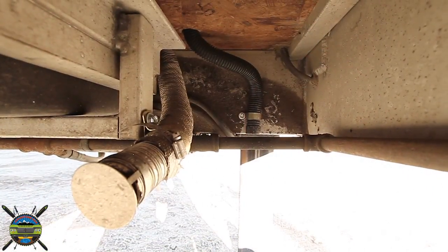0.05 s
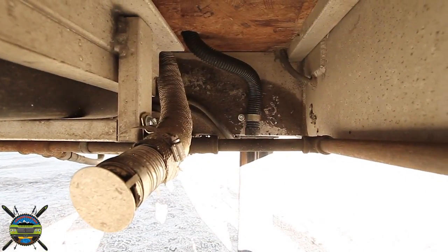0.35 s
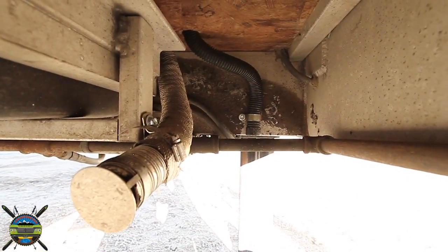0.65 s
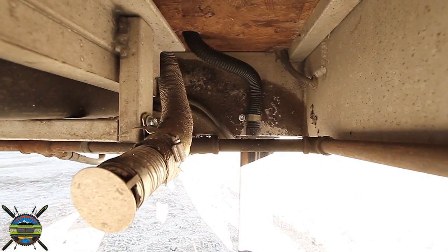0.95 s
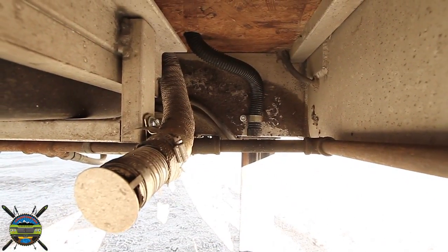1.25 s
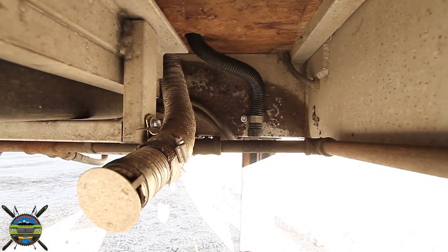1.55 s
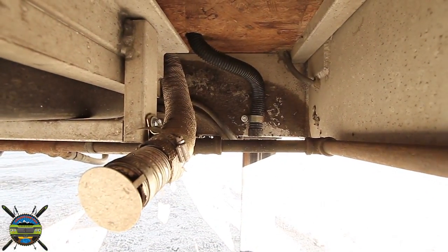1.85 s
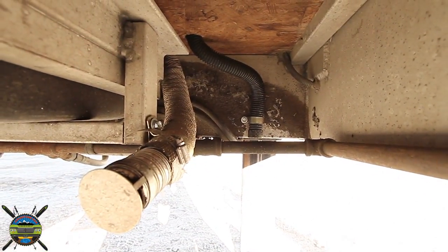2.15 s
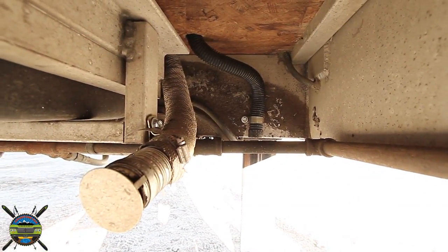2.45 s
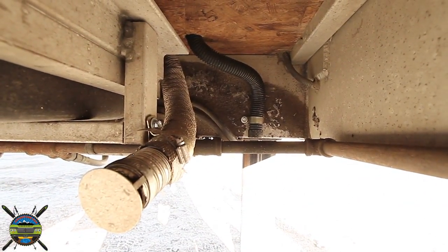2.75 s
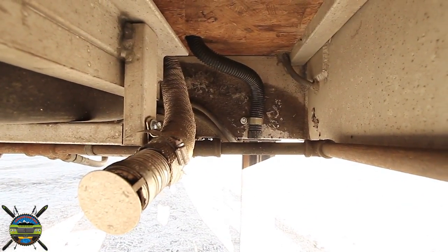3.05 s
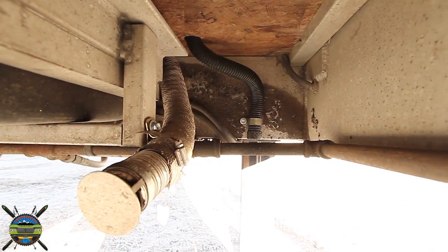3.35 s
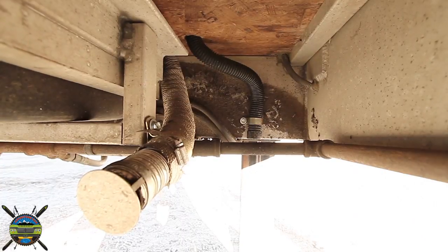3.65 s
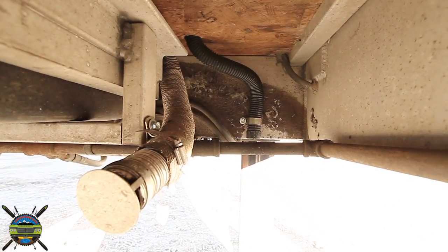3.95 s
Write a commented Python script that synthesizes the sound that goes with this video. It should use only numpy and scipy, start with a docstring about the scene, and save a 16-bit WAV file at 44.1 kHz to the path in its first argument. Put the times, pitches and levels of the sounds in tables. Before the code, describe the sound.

Low, unevenly puffing drone of a running air heater's exhaust, with a faint high motor whine.

```python
"""Outdoors, one microphone close to the exhaust pipe of a fuel-burning air heater under a parked vehicle.
The heater is running from the start: the flame's turbulence drones in the resonances of burner and pipe,
gas hisses out of the end cap, and the blower motor holds a thin whine. Every 0.83 s a dose of fuel
swells the sound and lifts the upper resonances. The flame puffs unevenly to the end,
with a few faint ticks and rustles on top."""
import sys
import numpy as np
from scipy import signal
from scipy.fft import rfft, irfft
from scipy.io import wavfile

SR = 44100
rng = np.random.default_rng(int(sys.argv[2]) if len(sys.argv) > 2 else 0)


def to_wav(s):
    """Save 16-bit WAV."""
    ch = np.atleast_2d(s).T  # columns
    pcm = np.round(np.clip(ch, -1, 1) * 32767)  # PCM
    wavfile.write(sys.argv[1], SR, pcm.astype(np.int16))


N = 176400
TIME = np.arange(N) / SR


def from_db(db):
    """Decibels to gain."""
    return 10 ** (np.asarray(db) / 20)


def rms_one(x):
    """Scale to unit rms."""
    return x / np.sqrt(np.mean(np.abs(x) ** 2) + 1e-20)


def drift(per_s):
    """Smooth random wander of spread 1, changing about `per_s` times a second."""
    step, run_in = 40, 2000   # samples per step; steps left to settle
    pole = np.exp(-2 * np.pi * per_s * step / SR)
    white = rng.standard_normal(N // step + run_in + 2)
    slow = signal.lfilter([1], [1, -2 * pole, pole * pole], white)[run_in:]
    return np.interp(np.arange(N) / step, np.arange(len(slow)), rms_one(slow))


def bump(middle_s, half_width_s):
    """A smooth rise and fall around one moment."""
    return np.exp(-((TIME - middle_s) / half_width_s) ** 2)


def coloured(x, spectrum):
    """Filter by a table of frequency_hz, gain_db."""
    hz, db = np.transpose(spectrum)
    bins_hz = np.maximum(np.arange(N // 2 + 1) * SR / N, 1)
    gain_db = np.interp(np.log(bins_hz), np.log(hz), db)
    return irfft(rfft(x) * from_db(gain_db), N)


def noise(spectrum):
    """Noise shaped by a table of frequency_hz, density_db (power in a 1 Hz band)."""
    return coloured(rng.standard_normal(N) * np.sqrt(SR / 2), spectrum)


def resonance(centre_hz, width_hz):
    """Turbulence ringing in one resonance whose centre may move; rms 1."""
    turbulence = rng.standard_normal((2, N + SR // 2))
    lowpass = signal.butter(2, width_hz / 2, fs=SR, output="sos")
    in_phase, quadrature = signal.sosfilt(lowpass, turbulence)[:, -N:]
    phase = 2 * np.pi * np.cumsum(centre_hz) / SR
    return rms_one(in_phase * np.cos(phase) + quadrature * np.sin(phase))


def driven(modes, dose):
    """Resonances whose level and pitch each follow the fuel dose (-1 to 1) by their own amount."""
    return sum(from_db(db + swell_db * dose) * resonance(hz + rise_hz * dose, width_hz)
               for hz, width_hz, db, swell_db, rise_hz in modes)


def flame(dose):
    """The burner's drone over an uneven rumble; both jump with each puff."""
    # low rumble of the flame: frequency_hz, density_db
    rumble_spectrum = [(15, -82), (28, -78.5), (50, -63), (75, -56.5), (105, -55), (155, -55.5),
                       (220, -67.5), (500, -99), (2000, -140)]
    # rise and fall of the rumble: time_s, gain_db
    rumble_curve = [(0, -4.5), (.35, -5), (.55, -0.5), (.85, 3), (1.3, 0), (1.5, 0.5), (2.12, 3),
                    (2.35, -5.5), (2.7, 2.5), (3.05, -4.5), (3.45, 2), (3.8, -8), (4, -3.5)]
    # lowest resonances of the burner: pitch_hz, width_hz, level_db, swell_db, rise_hz
    burner_modes = [(190.1, 28, -32, 2.5, 0), (243.2, 45.6, -25.5, 0.7, 0.0016),
                    (275.1, 32.6, -26.5, -0.5, 0.0033)]
    # puffs of the flame: middle_s, boost_db
    puffs = [(0.079, 8), (.16, 6), (.317, 2.5), (.54, 3.5), (.762, 5.5), (.835, 8), (0.979, 6), (1.06, 5),
             (1.15, 7), (1.342, 4), (1.42, 7.5), (1.74, 6.5), (2.125, 4), (2.715, 5), (2.82, 5.5),
             (2.967, 4), (3.15, 6), (3.415, 5.5), (3.47, 5), (3.649, 6.5)]
    steadiness, settle_s = .89, .059   # share of its chance swings that the flame evens out, and how fast
    between_puffs_db = -1.67
    rumble_db = np.interp(TIME, *np.transpose(rumble_curve)) + 2 * drift(per_s=12)
    rumble = noise(rumble_spectrum) * from_db(rumble_db)
    drone = driven(burner_modes, dose) * from_db(2.5 * drift(per_s=16))
    roar = drone + rumble
    window = signal.windows.hann(int(2 * settle_s * SR))
    power = signal.fftconvolve(rms_one(roar) ** 2, window / window.sum(), "same")
    steady_roar = roar / np.maximum(power, 1e-3) ** (steadiness / 2)
    puffs_db = sum(db * bump(middle_s, half_width_s=.019) for middle_s, db in puffs)
    return steady_roar * from_db(between_puffs_db + puffs_db)


def exhaust(dose):
    """Gas rings the pipe, rushes out and hisses at the end cap, fluttering with the flame's turbulence."""
    # resonances of the exhaust pipe: pitch_hz, width_hz, level_db, swell_db, rise_hz
    pipe_modes = [ (377.9, 60, -34.5, 1.1, 0), (556.7, 42, -40, 0, -5.5), (662.5, 42, -34, -0.5, 0),
                  (732.3, 36, -31, 0.5, -0.5), (835, 136, -33.5, 1.2, 0), (974, 87, -33, 1.1, -0.5),
                  (1331, 57, -32.5, 0, 3), (1420.5, 59, -34.5, -0.5, 3), (1523, 74, -37, 1.8, 11.5),
                  (1751, 34, -46, 0, -0.5), (1853, 24, -46, 0, -0.5), (1906, 36, -45, -1.5, 3.5),
                  (2052, 49, -44, 0.51, 2)]
    # hollow hiss at the end cap: pitch_hz, width_hz, level_db, swell_db, rise_hz
    outlet_modes = [ (2205, 110, -52.5, 3, 10), (2676, 120, -48.5, -1.5, 1), (2862, 157, -43, 0.3, 85),
                    (3416, 150, -50.5, 1.5, 25), (4750, 130, -66.5, 1, -1.5), (5050, 90, -71, 4, 6.5),
                    (5430, 110, -71, -2, 8), (5780, 115, -69, 5, 15), (7420, 290, -73.5, -2.5, -2.5),
                    (8040, 140, -78.5, -0.5, -2), (8620, 310, -76.5, 1.5, -2), (9400, 400, -83.5, 0, -0.5)]
    # broad rush of the exhaust: frequency_hz, density_db
    rush_spectrum = [(100, -76.5), (200, -52.5), (320, -61.5), (450, -63.5), (520, -61), (605, -61.5),
                     (770, -56.5), (990, -56), (1080, -76.5), (1230, -61.5), (1680, -71.5), (2000, -73.5),
                     (2400, -82), (3100, -77.5), (3270, -75), (3680, -83), (4000, -87), (4500, -87.5),
                     (5000, -99.5), (5600, -101), (6400, -107), (7200, -104), (9400, -110), (10500, -115),
                     (15500, -116.5)]
    rush = from_db(.3 * dose) * noise(rush_spectrum)
    # each outlet resonance also flickers by itself
    hiss = sum(from_db(1.2 * drift(per_s=6.5)) * driven([mode], dose) for mode in outlet_modes)
    flutter = from_db(.73 * drift(per_s=17))
    return flutter * (driven(pipe_modes, dose) + hiss + rush)


def blower_whine():
    """The blower motor's thin steady tones, wavering very slightly in pitch and level."""
    # tones of the motor: pitch_hz, relative_level_db
    tones = [(3790, -47), (3881, -70.5), (3919, -65.5), (4048, -56.5), (4404, -65), (4436, -67),
             (4565, -76.5), (4823, -72), (11881, -90)]
    gain_db, waver_db, wander_hz = 3, .56, .8
    offset_hz = wander_hz * drift(per_s=2)
    whine = np.zeros(N)
    for hz, db in tones:
        gain = from_db(db + gain_db + waver_db * drift(per_s=11))
        cycles = np.cumsum(hz + offset_hz) / SR + rng.random()
        whine += gain * np.sin(2 * np.pi * cycles)
    return whine


def ticks_and_rustles():
    """Short bright ticks, grainy rustles and tiny random crackles, all with the same tone colour."""
    # faint ticks: start_s, relative_level_db
    ticks = [(0.2239, -43), (0.7043, -60), (1.9979, -49), (2.6145, -48), (2.6329, -49), (2.8185, -56),
             (2.9677, -51.5), (3.2331, -56), (3.6344, -56), (3.906, -57)]
    # scratchy rustles: middle_s, half_width_s, relative_level_db
    rustles = [(.235, .017, -60), (.33, .05, -73), (.42, .03, -67), (0.683, .04, -72), (.8, .04, -73),
               (1.4, .04, -75), (1.64, .025, -74), (2.01, .04, -75), (2.53, .015, -72), (2.645, .04, -67),
               (2.99, .02, -71), (3.075, .038, -59)]
    # their bright colour: frequency_hz, gain_db
    colour = [(2000, -12.5), (5200, 2.5), (8000, -1), (12000, -3), (15500, -5.5)]
    tick_gain_db, decay_s = -.5, .0042
    crackles_per_s, crackle_gain_db = 23, -71.5
    tick_envelope = np.zeros(N)
    for start_s, db in ticks:
        decay = np.exp(-np.maximum(TIME - start_s, 0) / decay_s)
        tick_envelope += (TIME > start_s) * from_db(db + tick_gain_db) * decay
    rustle_envelope = sum(from_db(db) * bump(middle_s, half_s) for middle_s, half_s, db in rustles)
    grains = rms_one(rng.standard_normal(N) ** 3)   # cubing makes the noise spiky
    crackle_onsets = rng.random(N) < crackles_per_s / SR
    crackles = crackle_onsets * rng.standard_normal(N) * from_db(crackle_gain_db)
    snaps = tick_envelope * rng.standard_normal(N)
    return coloured(snaps + rustle_envelope * grains + crackles, colour)


def scene():
    """The running heater at one microphone beside the pipe."""
    dose_period_s, first_crest_s = .83, .12
    dose = np.cos(2 * np.pi * (TIME - first_crest_s) / dose_period_s)
    return (flame(dose) + exhaust(dose) + blower_whine() + ticks_and_rustles())[None]


def record(dry):
    """The top is cut steeply above 15.7 kHz."""
    lowpass = signal.ellip(10, .1, 80, 15700, fs=SR, output="sos")
    return signal.sosfilt(lowpass, dry)


dry = scene()
out = record(dry)
to_wav(out)
```